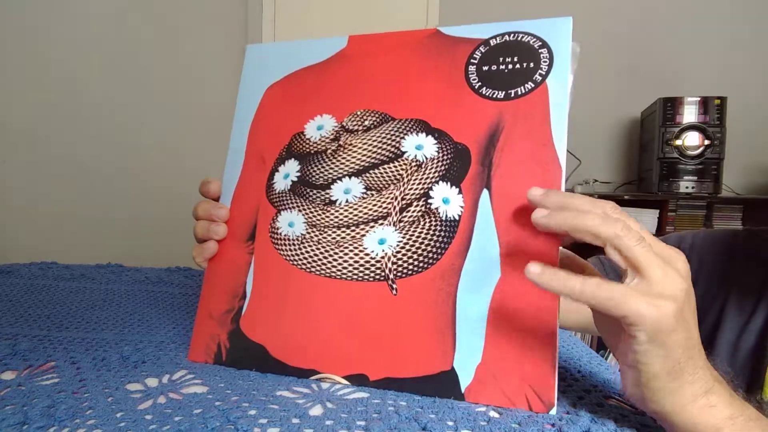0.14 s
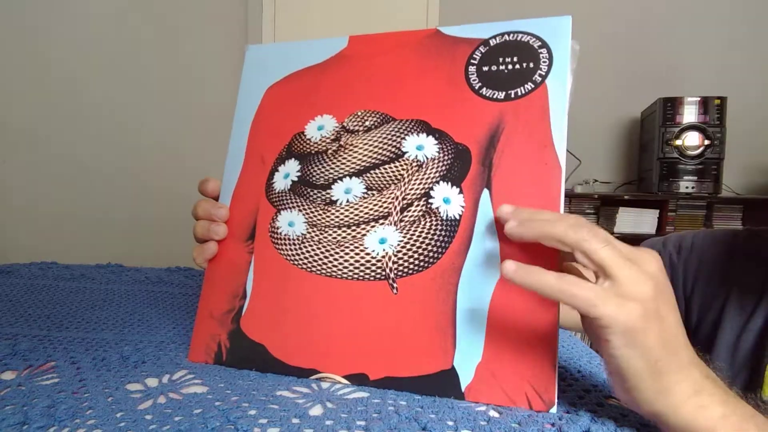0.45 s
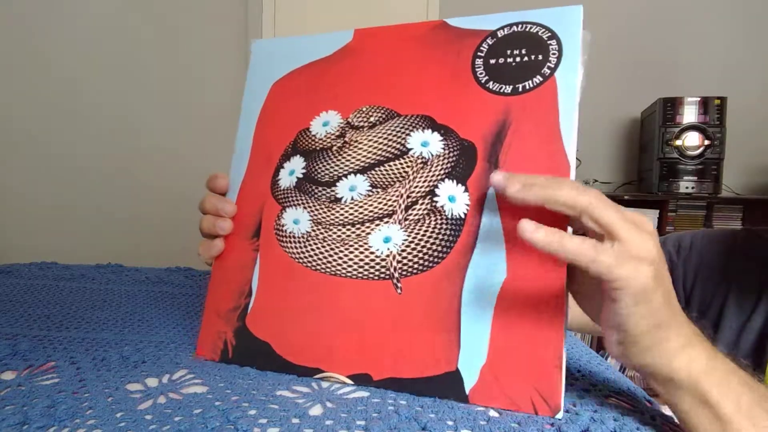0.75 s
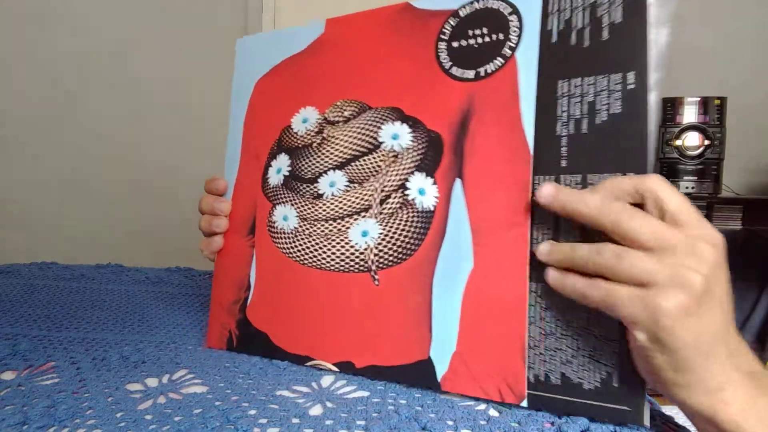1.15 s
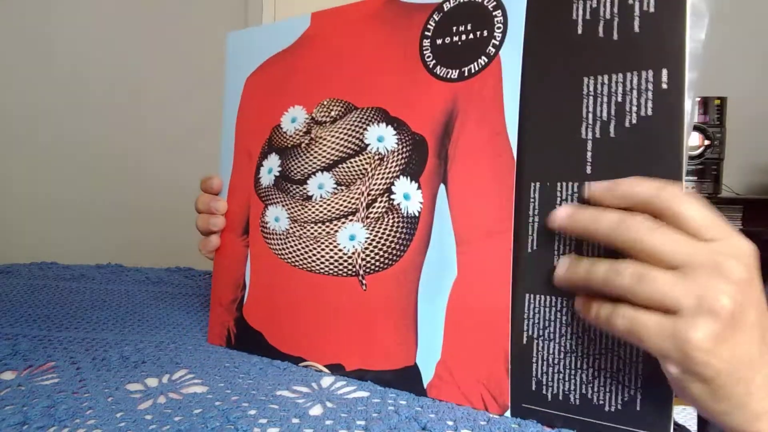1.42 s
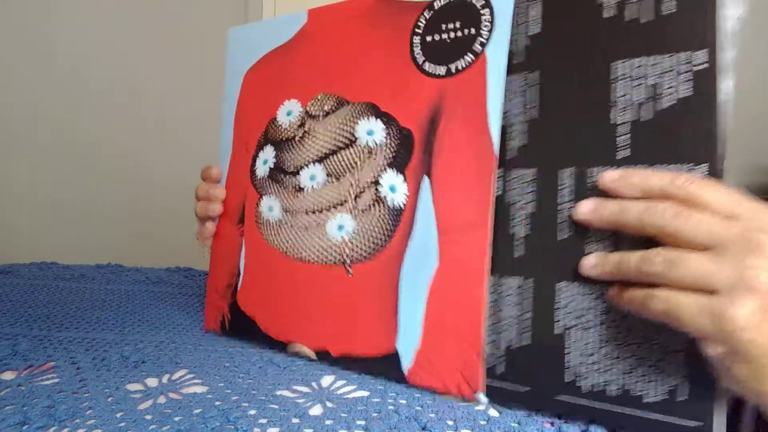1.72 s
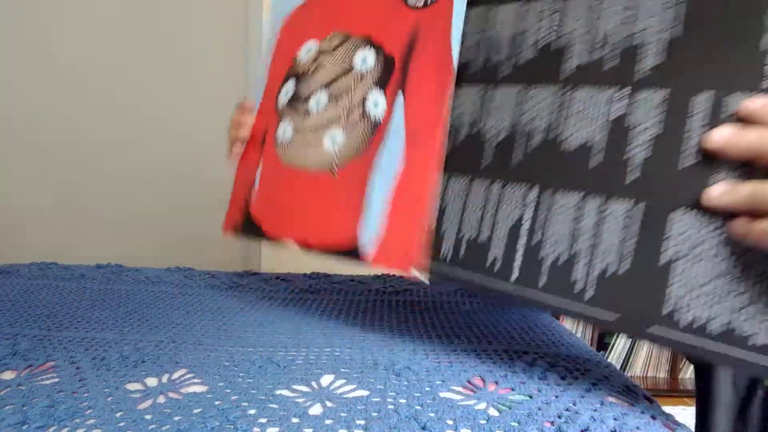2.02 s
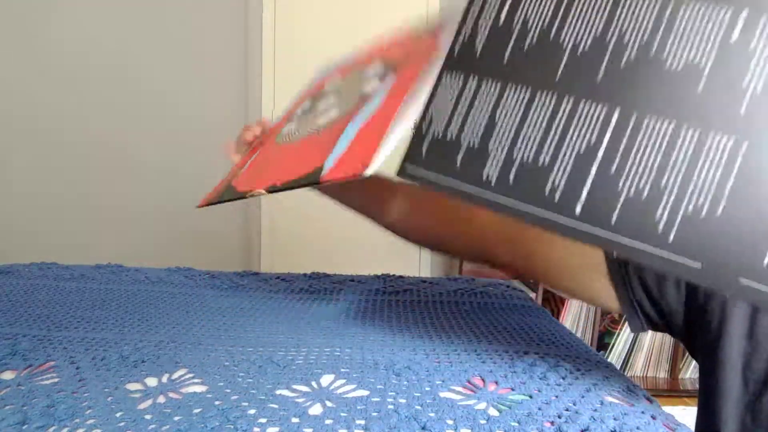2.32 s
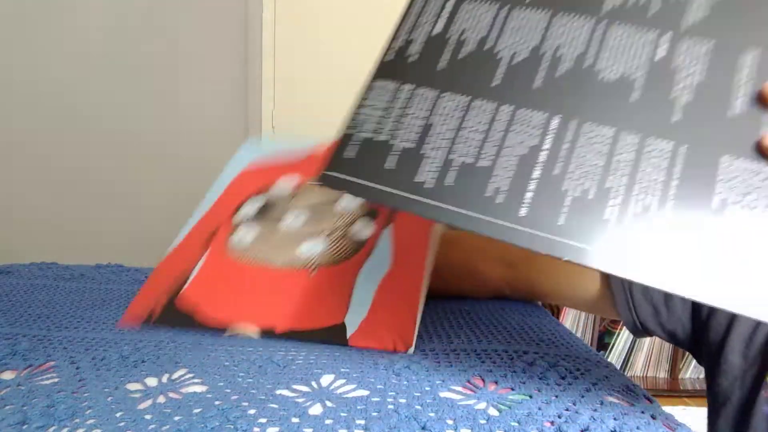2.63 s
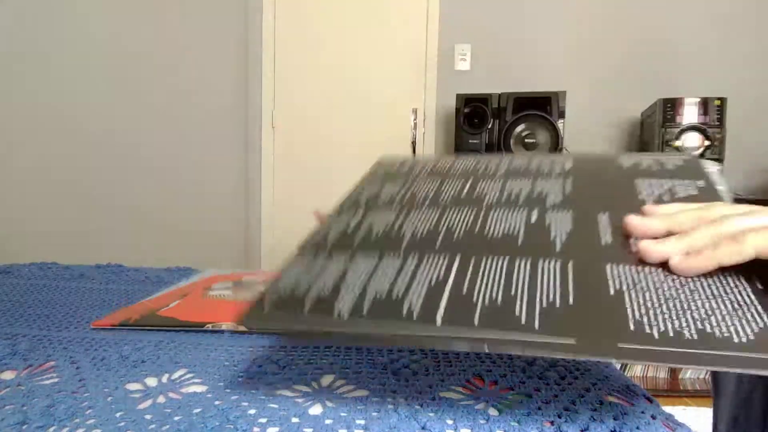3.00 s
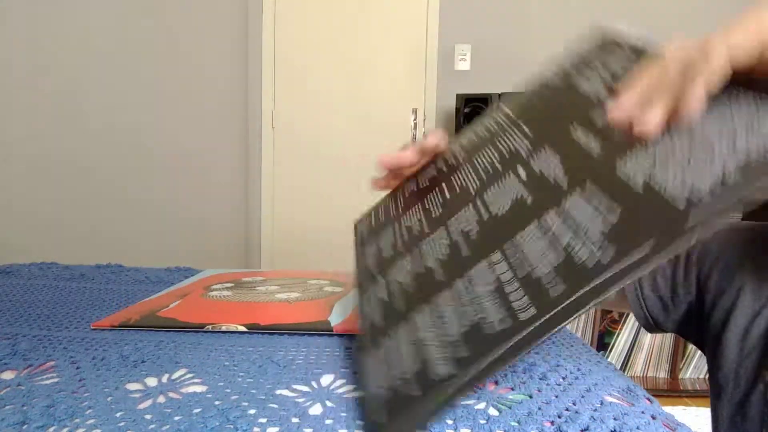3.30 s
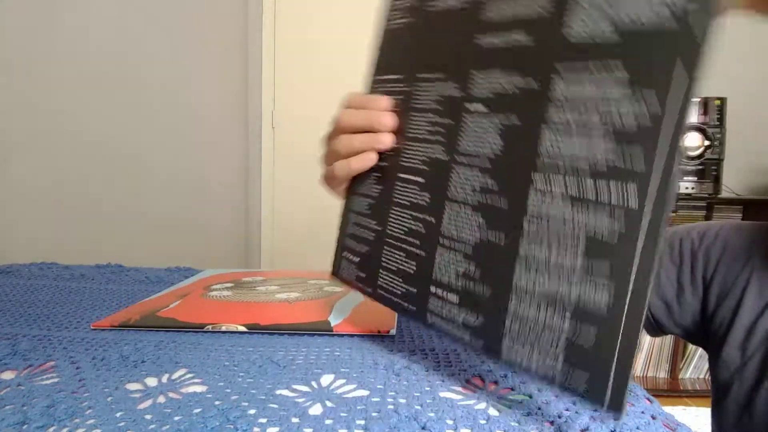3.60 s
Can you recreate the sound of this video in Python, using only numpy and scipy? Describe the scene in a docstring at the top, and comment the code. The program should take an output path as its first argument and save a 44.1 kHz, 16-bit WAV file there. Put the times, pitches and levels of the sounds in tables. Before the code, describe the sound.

A paper sleeve rustles against a cardboard record jacket, with light knocks in the first second. Bright, jerky scrapes swell around 0.9 to 2.0 s, with faint rising squeaks and a board thump at 1.0. It quietens, then the jacket drums softly onto a bed at 2.5 to 2.9. Handling peaks at 3.3 to 3.45 with sharp crease snaps and knocks, then fades. Close, dry, faint room air.

```python
"""In a quiet bedroom, a paper inner sleeve is drawn in jerks out of a cardboard jacket, close to two microphones.
Slipping fibres are shaped noise: a bright fizz over a duller rub, with a squeak of noise in a gliding resonance.
The flexing board is low rumbling noise with a scuff; knocks ring its modes, and creases snap as short fading tones.
The jacket drums low as it is laid on the bed, over faint room air and a short room tail.
The right microphone is nearer: the left one hears the sleeve later and duller."""
import sys
import numpy as np
from scipy import signal
from scipy.fft import rfft, irfft
from scipy.io import wavfile
from scipy.ndimage import uniform_filter1d

SR = 44100
rng = np.random.default_rng(int(sys.argv[2]) if len(sys.argv) > 2 else 0)


def wav_out(sig):
    """Save sig, one row per channel (or a flat mono array), as 16-bit PCM at SR to the path in sys.argv[1]."""
    wavfile.write(sys.argv[1], SR, np.round(np.clip(np.atleast_2d(sig).T, -1, 1) * 32767).astype(np.int16))


N = 165375  # length in samples

# Quiet air of the room. Each row: frequency in Hz, relative level in dB.
AIR_SPECTRUM = [(25, -47), (38, 3), (55, 7.5), (110, -2.5), (300, -10), (1000, -10.5), (3000, -20.5),
                (8000, -17), (13000, -31), (16000, -42)]
AIR_DB = -59.5
ROOM_T60_S, ROOM_DB = 0.12, -6  # time for the room tail to fall 60 dB, and its level

# The jacket drums low as it is laid on the bed. Each row: time in seconds, level in dB.
DRUM_LEVEL = [(2.47, -88), (2.5, -68), (2.61, -56.5), (2.7, -78), (2.79, -57), (2.86, -50.5), (2.92, -64),
              (2.97, -83)]
# Low tones of the jacket. Each row: frequency in Hz, width of one resonance in Hz, relative level in dB.
DRUM_TONES = [(110, 42, 1), (238, 19, 0)]

# Flexing of the board in the hands. Each row: time in seconds, rumble level in dB before a small trim,
# scuff over the rumble in dB before a small trim, rumble pitch in Hz.
FLEX = [(0.0, -58.5, 3, 170), (0.12, -58.5, 2.5, 219), (0.21, -63.5, 4.5, 154), (0.25, -54, -6, 252),
        (0.42, -68.5, -4, 165), (0.49, -58, -5.5, 265), (0.58, -58.5, 9, 180), (0.64, -61.5, 5, 225),
        (0.79, -67.5, 6, 190), (0.85, -64, -8, 365), (0.93, -63, 12.5, 198), (1.0, -43.5, -6.5, 317),
        (1.04, -57, 0, 237), (1.19, -57, -5.5, 260), (1.26, -65, -2, 167), (1.29, -57.5, 2.5, 266),
        (1.41, -59, -9, 181), (1.47, -64, -0.5, 172), (1.59, -60.5, -8, 284), (1.66, -52.5, 4.5, 265),
        (1.73, -62.5, 2, 259), (1.82, -67, 3, 170), (1.88, -57.5, -10, 309), (1.95, -58, -3, 224),
        (2.07, -53.5, -1, 306), (2.12, -59, -1, 179), (2.45, -63.5, -10.5, 167), (2.5, -51.5, -16.5, 200),
        (2.59, -52, -11.5, 195), (2.73, -46.5, -9, 290), (2.79, -53.5, -14, 160), (2.85, -55.5, 6.5, 196),
        (2.89, -59.5, -7, 187), (2.96, -61.5, -7, 154), (3.0, -53, -13, 158), (3.05, -60.5, -15, 195),
        (3.14, -63, -9, 196), (3.2, -59, 0.5, 346), (3.32, -48, -28, 290), (3.45, -44.5, -13, 328),
        (3.51, -58.5, -2, 190), (3.75, -63.5, -11, 205)]
# Colour of the rumble before its resonances. Each row: frequency in Hz, relative level in dB.
RUMBLE_SPECTRUM = [(30, -25), (60, -8), (100, 1), (500, -4.5), (800, -4), (1500, -51)]
# Colour of the scuff. Each row: frequency in Hz, relative level in dB.
SCUFF_SPECTRUM = [(300, -12), (550, 2.5), (800, -3), (1100, 2), (1600, -1), (2200, 5), (3500, -20.5)]
RUMBLE_WIDTH_HZ = 490  # width of one resonance; the rumble passes through two

# Short pushes on the board. Each row: start in seconds, level in dB before a common scale, contact time in ms.
KNOCKS = [(0.096, -37.5, 1), (0.2608, -34, 0.75), (0.5022, -34, 0.79), (0.8471, -35, 1.32),
          (1.0002, -31.5, 0.45), (1.6477, -41, 1.2), (2.0726, -35, 1.27), (2.4953, -45, 0.54),
          (2.647, -36, 1.9), (2.8337, -37.5, 0.43), (2.839, -40.5, 1.6), (2.982, -43.5, 2.9),
          (3.1714, -42.5, 1), (3.277, -32, 1.2), (3.3035, -33.5, 0.85), (3.3134, -28.5, 0.91),
          (3.3427, -30.5, 1.2), (3.4223, -25.5, 0.95), (3.4404, -30.5, 1.03)]
# Ringing modes of the board. Each row: frequency in Hz, level in dB before a weight that grows with
# frequency, time to fall 60 dB in seconds.
BOARD_MODES = [(156, -5, 0.23), (343, -16, 0.047), (572, -27, 0.028), (1048, -22, 0.14), (1295, -18, 0.065),
               (1735, -21.5, 0.091)]
KNOCK_LOW_CUT_HZ = 163

# Creases snapping. Each row: start in seconds, level in dB, pitch in Hz, tick over the ring in dB.
SNAPS = [(.0250, -45, 3930, 10), (.0955, -41.5, 3130, -6.5), (0.2606, -43, 2770, -9),
         (2.171, -57, 3500, 15), (2.2344, -45, 3550, 9), (2.6400, -37, 3200, -2), (2.8333, -42, 3260, 1),
         (3.1712, -32.5, 2740, 1.5), (3.2011, -44.5, 3060, 10), (3.2701, -37, 2950, 2),
         (3.3428, -27, 3200, -4), (3.3784, -20, 3050, 2.5), (3.3918, -28, 3480, -1), (3.4012, -31, 3450, 9),
         (3.6408, -39, 4530, 7.5), (3.6478, -43.5, 3300, 8.5), (3.6664, -46, 5550, 5.5),
         (3.6716, -52, 5560, 7)]
SNAP_T60_S, TICK_T60_S = 0.0069, 0.004  # times to fall 60 dB

# Small random creases: average number per second, level over the rub table in dB,
# average extra level in dB (before a cap), time to fall 60 dB in seconds.
CRACKS_PER_S, CRACK_DB, CRACK_SPREAD_DB, CRACK_T60_S = 220, 3, 3, 0.0042

# Squeak in the rub, rising as the sleeve comes free. Each row: time in seconds, pitch in Hz, level in dB.
SQUEAK = [(.6, 2400, -70), (.7, 2780, -70), (.79, 3200, -60.5), (.9, 3320, -60), (.97, 3930, -51),
          (1.04, 4260, -77), (1.5, 3100, -69), (1.57, 3300, -68), (1.65, 3920, -54.5), (1.77, 3700, -62),
          (1.88, 4270, -61), (1.95, 4330, -78)]
SQUEAK_WIDTH_HZ = 350  # width of one resonance; the squeak passes through two

# Paper sliding on card. Each row: time in seconds, fizz level in dB before a trim,
# rub over the fizz in dB before a trim.
SLIDE = [(0.0, -67.5, 5), (0.03, -62.5, 4.5), (0.05, -70.5, 6), (0.19, -60, 3.5), (0.24, -66, -5),
         (0.26, -60.5, 9), (0.29, -56.5, -1), (0.34, -69, 1), (0.45, -74, 3), (0.56, -53.5, -1),
         (0.65, -58, -1.5), (0.74, -67, 1.5), (0.83, -56, 6.5), (0.87, -50.5, -2), (0.92, -50.5, -2),
         (0.99, -46.5, -6), (1.09, -56.5, 0), (1.21, -63.5, 3.5), (1.24, -55.5, -0.5), (1.28, -64.5, 1),
         (1.33, -51, -11), (1.36, -58.5, -6), (1.4, -53, -12), (1.44, -54, -11), (1.46, -66, 5),
         (1.62, -55.5, -2.5), (1.68, -59, 0), (1.89, -49, -11), (1.96, -56, -1), (1.995, -46, -5.5),
         (2.14, -65.5, 1), (2.26, -70, 7), (2.31, -73, -3), (2.35, -62.5, -6.5), (2.42, -72, 2),
         (2.46, -62.5, -6.5), (2.53, -60, -1.5), (2.61, -70, -1), (2.64, -56, 4.5), (2.67, -57.5, 7),
         (2.7, -50, -4.5), (2.76, -52, 0), (2.8, -65, 0), (2.822, -58.5, -1), (2.845, -56, 0),
         (2.87, -57, -4.5), (2.92, -64.5, -3), (3.13, -72.5, 0), (3.16, -55.5, -3.5), (3.2, -53, -5.5),
         (3.24, -69.5, 3), (3.29, -48, -2.5), (3.33, -51, -1.5), (3.371, -47.5, 1), (3.382, -41, 4.5),
         (3.41, -41, -2.5), (3.44, -45.5, -1.5), (3.5, -46.5, -10.5), (3.535, -51.5, -0.5),
         (3.55, -58.5, -2), (3.63, -65, 3), (3.66, -63.5, 4), (3.75, -68, -5)]
# Colour of the fizz. Each row: frequency in Hz, relative level in dB.
FIZZ_SPECTRUM = [(3000, -13.5), (6000, -7.5), (8000, -5), (10000, -3.5), (11500, 1.5), (13000, 2.5),
                 (14300, -1.5), (16000, -13)]
# Colour of the rub. Each row: frequency in Hz, relative level in dB.
RUB_SPECTRUM = [(1200, -12), (2000, 0), (2800, 3), (3400, 2), (4200, 0.5), (5200, 1), (6000, -7.5),
                (8000, -14.5), (11000, -32)]

# Stereo likeness of the steady sound, left to right, rising and falling across frequency.
# Each row: frequency in Hz, likeness (limited to -1..1).
STEREO_LIKENESS = [(60, -0.6), (130, 0.17), (250, 0.12), (500, 0.55), (1100, 1), (1750, 0.14), (2100, 1),
                   (2520, 0.98), (2850, -0.82), (3400, 1), (4050, -0.35), (4450, 0.87), (5000, 0.89),
                   (5400, -0.44), (5900, 1), (6500, 0.12), (7150, 0.53), (7800, 0.16), (14000, 0.52)]
# Level at the farther, left microphone. Each row: frequency in Hz, left over right in dB.
FAR_LEVEL = [(60, -2.5), (380, -1), (950, 0), (2300, -2), (3400, -2), (6000, -3), (10000, -4.5),
             (15000, -8)]
# Stereo phase of left against right, in steps around a delay of about 0.4 ms.
# Each row: frequency in Hz, lead of the left in radians (negative is later).
STEREO_PHASE = [(0, 0), (1350, -.1), (2080, -3.1), (2550, -3.2), (3150, -6.2), (3700, -6.4), (4400, -9.3),
                (5000, -9.6), (5700, -12.5), (6200, -12.7), (6900, -15.5), (7400, -15.9), (8400, -18.9),
                (14400, -34.5)]
LOW_CUT_HZ, TOP_EDGE_HZ = 38, 14260  # limits of the microphones and the recorder


def amp(db):
    """Turns dB into a gain."""
    return 10 ** (np.asarray(db) / 20)


def evened(x):
    """Scales a sound to an average (rms) strength of 1."""
    return x / np.sqrt(np.mean(x ** 2) + 1e-20)


def read(points, hz):
    """Reads a frequency table with straight lines over log frequency."""
    f, value = np.transpose(points)
    return np.interp(np.log(hz + 1), np.log(f + 1), value)


def curve(table, axis):
    """Draws one column of a time table as straight lines, one value per sample."""
    rows = np.array(table, float)
    return np.interp(np.arange(N) / SR, rows[:, 0], rows[:, axis])


def add(mix, start_s, sound):
    """Mixes a sound in at its start time."""
    part = mix[round(start_s * SR):][:len(sound)]
    part += sound[:len(part)]


def lumps(lump_s):
    """Noise smoothed twice, which wanders slowly with rms 1."""
    size = max(int(lump_s * SR), 2)
    once = uniform_filter1d(rng.standard_normal(N), size)
    return evened(uniform_filter1d(once, size))


def slips(level_db, colour, grain_db, lump_db, lump_s):
    """Dense tiny slips of uneven size, in clumps, coloured by what they shake; two unrelated draws."""
    noise = rng.standard_normal((2, N))
    unevenness_db = grain_db * lumps(0.00042) + lump_db * lumps(lump_s)
    drive = noise * amp(unevenness_db)
    hz = np.fft.rfftfreq(N, 1 / SR)
    coloured = irfft(rfft(drive) * amp(read(colour, hz)), N)
    return amp(level_db) * evened(coloured)


def resonate(x, hz, width_hz):
    """A resonance that follows the curve hz: shift it to 0 Hz, smooth, and shift back."""
    turn = np.exp(2j * np.pi * np.cumsum(hz) / SR)
    r = np.exp(-np.pi * width_hz / SR)
    return (turn * signal.lfilter([1 - r], [1, -r], x / turn)).real


def resonate_twice(x, hz, width_hz):
    """Two equal resonances in a row, which pick out the pitch more sharply, evened to rms 1."""
    return evened(resonate(resonate(x, hz, width_hz), hz, width_hz))


def air():
    """Faint, steady noise of the room air, with the same kind of uneven grain as the slips."""
    return slips(AIR_DB, AIR_SPECTRUM, grain_db=0.1, lump_db=0.47, lump_s=0.015)


def room(x):
    """Short furnished-room tail: fading noise stands for many echoes, in two separate draws."""
    t = np.arange(8000) / SR
    fade = amp(-60 * t / ROOM_T60_S) * (t > 0.002)  # the first echoes come after 2 ms
    tail = rng.standard_normal((2, len(t))) * fade
    tail /= np.linalg.norm(tail[0])
    return amp(ROOM_DB) * signal.fftconvolve(x[None], tail, axes=1)[:, :N]


def drum():
    """Shaking, made of noise, that rings two low tones of the jacket."""
    shake = rng.standard_normal((2, N))
    tones = np.zeros((2, N))
    for hz, width_hz, db in DRUM_TONES:
        tones += amp(db) * resonate_twice(shake, np.full(N, hz), width_hz)
    return amp(curve(DRUM_LEVEL, axis=1)) * tones


def flexing_board():
    """The board bends with a rumble of gliding pitch and a scuff, both made of tiny slips."""
    rumble_db = curve(FLEX, axis=1)
    scuff_db = rumble_db + curve(FLEX, axis=2) + 0.09
    slipping = slips(0, RUMBLE_SPECTRUM, grain_db=1.8, lump_db=0.88, lump_s=0.037)
    rumble = resonate_twice(slipping, curve(FLEX, axis=3), RUMBLE_WIDTH_HZ)
    scuff = slips(scuff_db, SCUFF_SPECTRUM, grain_db=1.6, lump_db=3.0, lump_s=0.023)
    return amp(rumble_db + 0.5) * rumble + scuff


def knocks():
    """Each push and its rebound is heard directly and rings the board."""
    pushes, t = np.zeros(N), np.arange(6000) / SR
    for start_s, db, contact_ms in KNOCKS:
        u = t[:800] * 1000 / contact_ms  # time counted in contact times
        swing = np.sin(np.pi * np.minimum(u, 3))  # push, rebound and a second push
        push = swing * np.minimum(2 * u, 1) * np.exp(-0.6 * u)
        add(pushes, start_s, amp(db) * push * 0.77)
    ring = np.zeros(len(t))
    for hz, db, t60_s in BOARD_MODES:
        ring += amp(db - 60 * t / t60_s) * np.sin(2 * np.pi * hz * t) * hz / 5000
    struck = pushes + signal.oaconvolve(pushes, ring)[:N]
    low_cut = signal.butter(2, KNOCK_LOW_CUT_HZ, "high", fs=SR, output="sos")
    return signal.sosfilt(low_cut, struck)


def snaps():
    """Each snapping crease gives a short two-tone ring of the sheet and a bright tick of noise."""
    out, t = np.zeros(N), np.arange(2000) / SR
    # Differences between noise samples favour the treble.
    ticks = np.diff(rng.standard_normal((len(SNAPS), len(t) + 1)))
    for (start_s, db, hz, tick_db), tick in zip(SNAPS, ticks):
        ring = np.sin(2 * np.pi * hz * t) + 0.5 * np.sin(2 * np.pi * 1.63 * hz * t)
        fading_ring = ring * amp(-60 * t / SNAP_T60_S)
        fading_tick = tick * amp(tick_db - 60 * t / TICK_T60_S)
        add(out, start_s, amp(db) * (fading_ring + fading_tick))
    return out


def crackle(rub_db):
    """Small creases give way at random while the paper rubs, each with a very short ring."""
    extra_db = CRACK_SPREAD_DB * np.minimum(rng.exponential(1, N), 4)
    happens = rng.random(N) < CRACKS_PER_S / SR
    size = amp(rub_db + CRACK_DB + extra_db) * happens
    pitch_choice, t = rng.integers(0, 8, N), np.arange(400) / SR
    out = np.zeros(N)
    for k, hz in enumerate(np.geomspace(1200, 6000, num=8)):
        ring = np.sin(2 * np.pi * hz * t) * amp(-60 * t / CRACK_T60_S)
        out += signal.oaconvolve(size * (pitch_choice == k), ring)[:N]
    return out


def squeak():
    """Noise through two equal resonances that glide together in pitch."""
    noise = rng.standard_normal((2, N))
    tone = resonate_twice(noise, curve(SQUEAK, axis=1), SQUEAK_WIDTH_HZ)
    return amp(curve(SQUEAK, axis=2)) * tone


def sliding_paper(fizz_db, rub_db):
    """Fibres slip on the card as a bright fizz over a duller, more clumped rub."""
    fizz = slips(fizz_db + 6.5, FIZZ_SPECTRUM, grain_db=0.98, lump_db=1.0, lump_s=0.01)
    rub = slips(rub_db + 3.5, RUB_SPECTRUM, grain_db=0.72, lump_db=2.53, lump_s=0.033)
    return fizz + rub


def stereo(steady, struck):
    """Right has the plain sound; left is later, duller and, for the steady part, only partly like it."""
    hz = np.fft.rfftfreq(N, 1 / SR)
    same = np.clip(read(STEREO_LIKENESS, hz), -1, 1)
    late = np.exp(1j * np.interp(hz, *np.transpose(STEREO_PHASE)))
    shared, separate = rfft(steady)
    alike = late * (same * shared + rfft(struck))
    unlike = np.sqrt(1 - same ** 2) * separate  # fills up the power that is not alike
    left = amp(read(FAR_LEVEL, hz)) * (alike + unlike)
    return np.array([irfft(left, N), steady[0] + struck])


def scene():
    """Adds up paper, board, hits and room air, and spreads them over left and right."""
    fizz_db = curve(SLIDE, axis=1)
    rub_db = fizz_db + curve(SLIDE, axis=2)
    paper = sliding_paper(fizz_db, rub_db)
    board = flexing_board()
    struck = snaps() + knocks() + crackle(rub_db)
    steady = paper + board + drum() + squeak() + air() + room(struck)
    return stereo(steady, struck)


def record(dry):
    """Low cut of the microphones, then the treble limit of the recorder."""
    low_cut = signal.butter(3, LOW_CUT_HZ, "high", fs=SR, output="sos")
    dry = signal.sosfilt(low_cut, dry)
    treble_limit = signal.firwin(701, TOP_EDGE_HZ, window=("kaiser", 9), fs=SR)
    return signal.oaconvolve(dry, treble_limit[None], "same")


dry = scene()
out = record(dry)
wav_out(out)
```